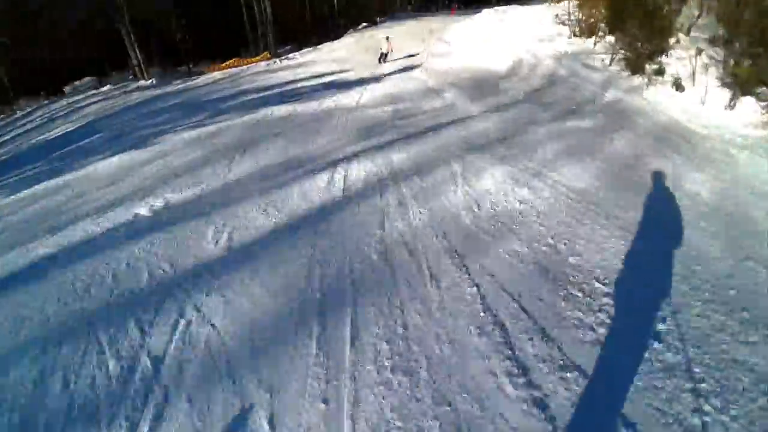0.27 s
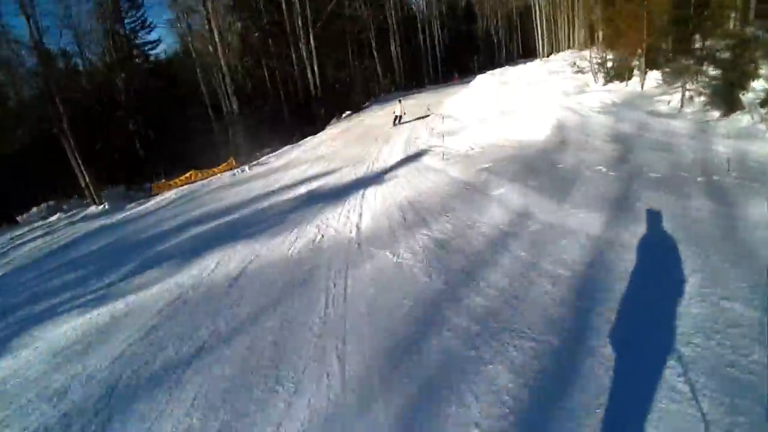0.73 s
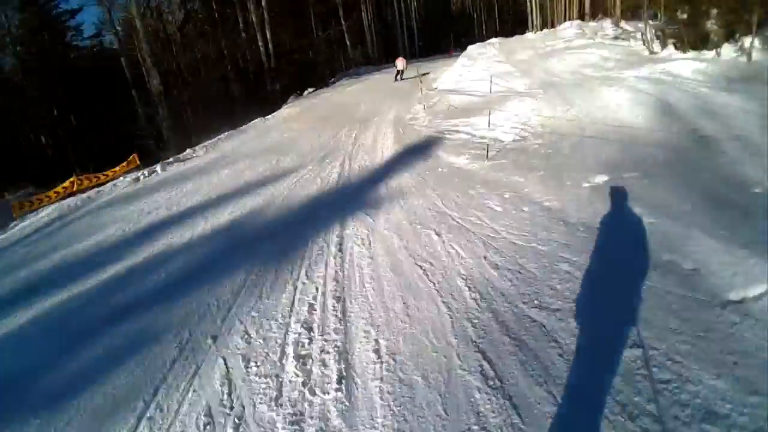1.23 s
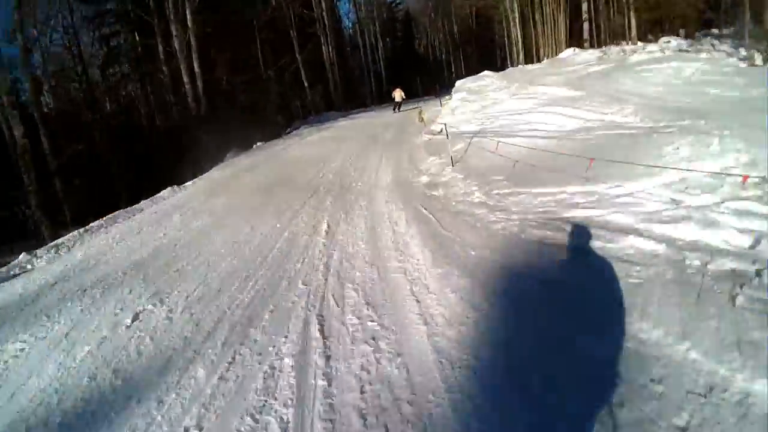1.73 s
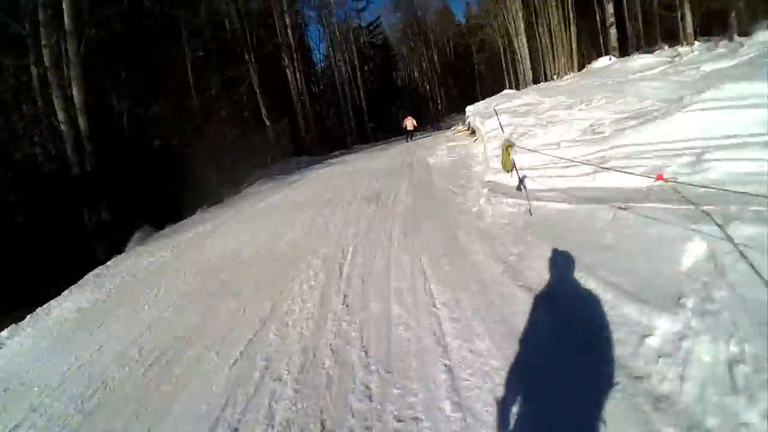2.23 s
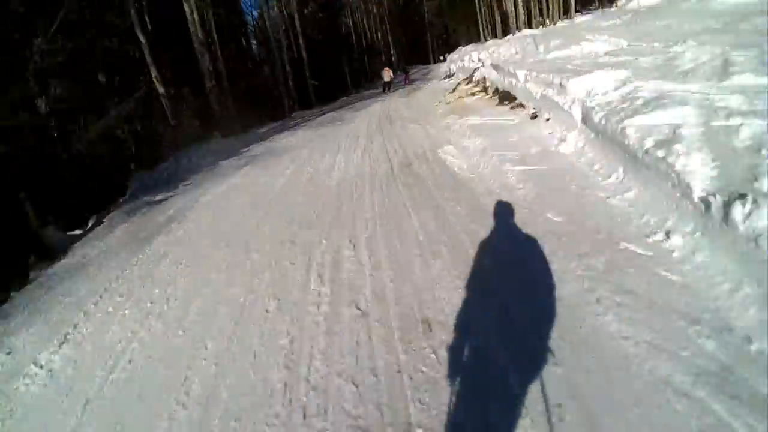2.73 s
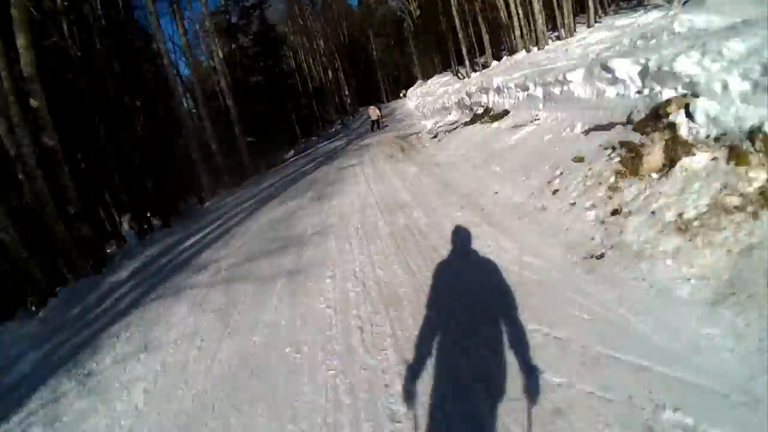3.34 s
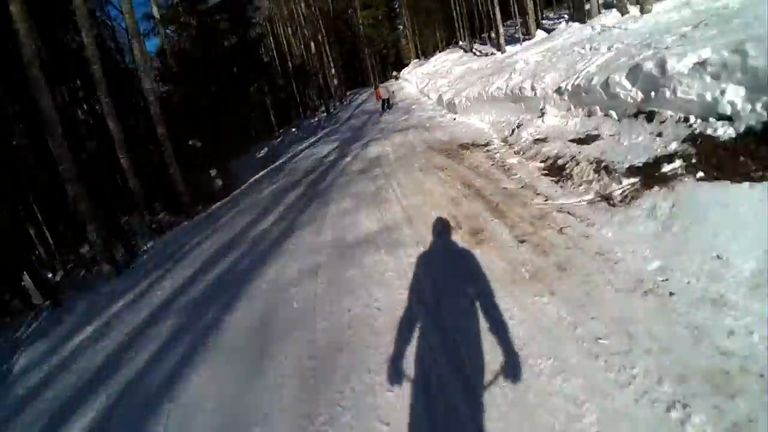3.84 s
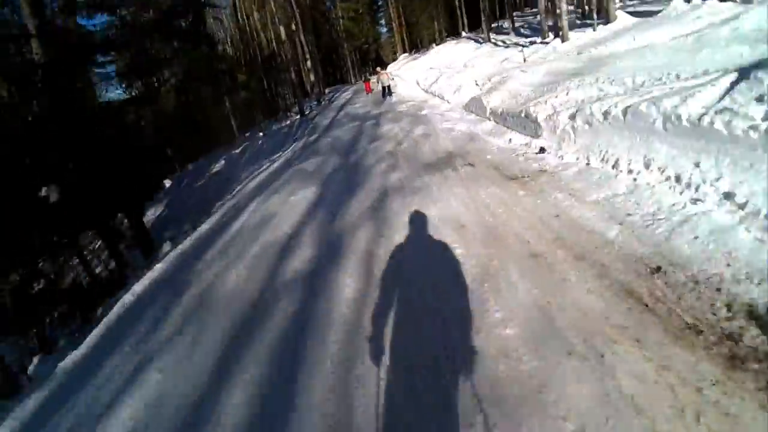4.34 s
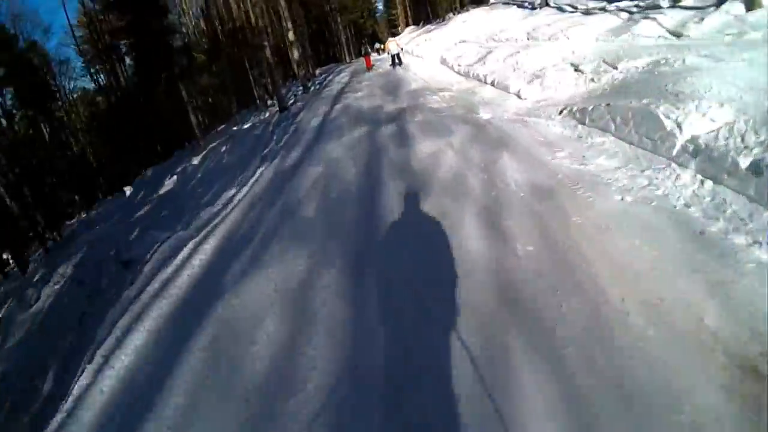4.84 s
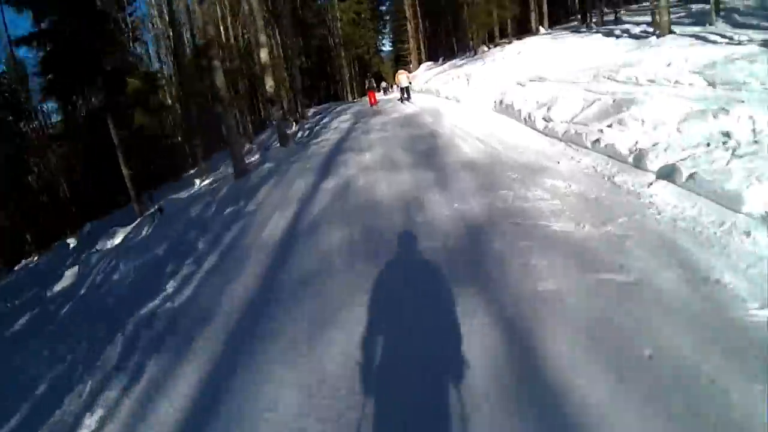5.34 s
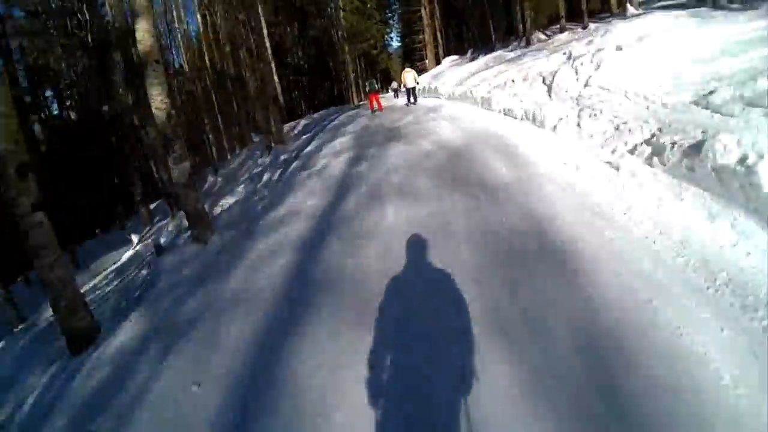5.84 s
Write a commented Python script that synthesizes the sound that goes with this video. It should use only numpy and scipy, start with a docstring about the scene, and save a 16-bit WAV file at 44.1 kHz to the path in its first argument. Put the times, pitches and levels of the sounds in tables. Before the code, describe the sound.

Skis slide over packed snow with a continuous, muffled scrape that swells and eases a little above a faint low rumble. Bumps make a plastic case knock on its mount, lightly at first, then in sharper clicks and short rattles with tiny creaks. The two loudest knocks come in the later part, then only the sliding remains. Everything sounds hollow, heard from inside the closed camera case worn by the skier.

```python
"""Skis on packed snow, heard inside a camera case

Friction of snow grains and ski edges excites the hollow resonances of the closed case the skier wears;
its wall shuts out the treble, and a low rumble is conducted through the skier's body.
Bumps make the case knock and rock on its mount; after some knocks its plastic joint ticks and
creaks by stick-slip friction. The camera adds a faint hiss and whine."""
import sys
import numpy as np
from scipy import signal
from scipy.fft import rfft, irfft
from scipy.io import wavfile
from scipy.ndimage import uniform_filter1d

SR = 44100
rng = np.random.default_rng(int(sys.argv[2]) if len(sys.argv) > 2 else 0)


def wrap_up_sound(samples):
    """Save the sound to the file named by the first command line argument, as 16-bit audio."""
    columns = np.atleast_2d(samples).T
    # keep every value between -1 and 1, then stretch to whole-number steps
    tamed = np.clip(columns, -1, 1)
    steps = np.round(tamed * 32767).astype(np.int16)
    wavfile.write(sys.argv[1], SR, steps)


N = 268128
TIME = np.arange(N) / SR

# tones of the camera's electronic whine: f/Hz, rms level/dB
WHINE_TONES = [(15132, -97), (15225, -97)]
# spectrum of the camera's hiss: f/Hz, relative level/dB
HISS_SPECTRUM = [(5000, -19), (6600, -1), (8200, -11.5), (9500, 1.5), (11500, 0.5), (15500, -2)]
# spectrum of a faint treble fizz, a signal artefact that rises with each low thud: f/Hz, level/dB
FIZZ_SPECTRUM = [(5000, -25), (6800, -10), (8300, -13.5), (10000, -2), (12500, 0), (15500, 0.5)]
# spectrum of the body-borne rumble: f/Hz, relative level/dB
RUMBLE_SPECTRUM = [(20, 3), (50, -6.5), (95, -6.5), (120, 0), (150, 1.5), (200, -7), (300, -13),
                   (450, -9.5), (900, -56), (3000, -81)]
# strength of the skis' scrape along the run: t/s, level/dB
SCRAPE_LEVEL = [(0.0, -51.5), (0.19, -46.0), (0.35, -49.5), (0.53, -42.5), (0.75, -46.5), (1.53, -40.5),
                (1.73, -42.5), (1.83, -38.5), (2.17, -44.0), (2.29, -42.0), (2.75, -46), (3.13, -43.5),
                (3.29, -49), (3.53, -43.5), (3.75, -47.5), (4.09, -44.0), (4.21, -46.5), (5.61, -44),
                (5.71, -47.5), (5.81, -44), (5.91, -48.0), (6.08, -45)]
# spectrum of the scrape through the case wall: f/Hz, relative level/dB
SCRAPE_SPECTRUM = [(250, -29), (550, -27.5), (720, -19), (1000, -15), (1200, -12.5), (1520, -5.5),
                   (1800, -10.5), (2300, -7.5), (2750, -7), (3100, -17.5), (3600, -26), (4100, -34.5),
                   (4750, -35.5), (5900, -67.5)]
# air and wall resonances of the case: f/Hz, half-width/Hz, lift/dB
CASE_MODES = [(442, 25, 12), (844, 71.7, 14), (1293, 116, 14), (2588, 70, 4.5), (4400, 42, 3.5)]
# spectrum of one slip in the plastic joint: f/Hz, relative level/dB
SLIP_SPECTRUM = [(200, -16.5), (650, -19), (1300, -4.5), (1800, -1.5), (2400, -10), (3150, -0.5),
                 (3700, -19), (4150, -22), (4900, -46), (5600, -45.5), (6200, -63.5), (8300, -71.5),
                 (9600, -44.5), (11400, -41.5), (13000, -59), (16000, -60.5)]
# resonances of the joint's plastic: f/Hz, half-width/Hz, lift/dB
JOINT_MODES = [(420, 56, 14.5), (1460, 55, 5), (1810, 27, 10.5), (3086, 18, 7), (3660, 85, 5)]
# creaks of the joint: t/s, duration/s, initial slip rate/Hz, initial slip level/dB
JOINT_CREAKS = [(1.244, 0.011, 260, -37), (1.478, .02, 350, -41), (2.2295, 0.033, 240, -25),
                (2.81, 0.021, 220, -29.5), (3.073, 0.027, 275, -37.5), (4.2672, .03, 250, -15),
                (5.1375, .008, 155, -20.5)]
# spectrum of a blunt knock of the case on its mount: f/Hz, relative level/dB
KNOCK_SPECTRUM = [(100, -34), (400, -22.5), (700, -12.5), (900, -6), (1100, 3.5), (1380, 4.5),
                  (1700, -14.5), (2100, -8), (2700, -7.5), (3200, -15.5), (3750, -39), (4500, -33.5),
                  (5500, -63), (8000, -81.5)]
# bumps that knock the case: t/s, click level/dB, rocking f/Hz, bounces (rounded to a whole number)
BUMPS = [ (.484, -35.5, 56, 0.5), (0.617, -28, 44.4, 0.5), (1.209, -34, 58, 0.5), (1.308, -29, 46, 0.5),
         (1.4545, -22, 44, 1), (1.567, -28, 49, 0.5), (1.6886, -19.3, 43, 4.5), (1.9351, -24, 53, 0.5),
         (1.9771, -15, 43, 1.5), (2.1912, -15.5, 56.7, 0.5), (2.302, -17, 52.5, 0),
         (2.7934, -15, 52.6, 0.5), (2.8364, -19, 46.7, 0), (3.0593, -19, 42.17, 3), (3.711, -28.5, 58, 0),
         (3.985, -27, 53.4, 0.5), (4.0292, -19, 41.8, 0), (4.2428, -8.5, 53, 0), (4.315, -33.5, 53, 0.5),
         (4.464, -27, 55.5, -0.5), (4.5288, -21, 52.4, 0.5), (4.933, -30.5, 56, 0.5),
         (4.998, -35, 53.6, 0.5), (5.1196, -8, 52.1, 0)]

CRUISE_DB, FIRM_KNOCK_DB = -45, -20  # reference levels of scrape and click


def undb(db):
    """Amplitude ratio of a level in decibels."""
    return 10 ** (np.asarray(db) / 20)


def unit(x):
    """Normalisation to rms 1."""
    return x / np.sqrt(np.mean(x ** 2))


def walk(rate):
    """Slow random modulation, rms 1: values held for 1 / rate seconds and smoothed twice."""
    hold = max(int(SR / rate), 2)
    steps = np.repeat(rng.standard_normal(N // hold + 1), hold)
    return unit(uniform_filter1d(uniform_filter1d(steps, hold), hold)[:N])


def response(spectrum, modes=(), size=4096):
    """Minimum-phase impulse response, peak 1, of a spectrum lifted by resonances."""
    f = np.maximum(np.fft.rfftfreq(size, 1 / SR), 1)
    hz, db = np.transpose(spectrum)
    db = np.interp(np.log(f), np.log(hz), db)
    for centre, width, lift in modes:
        db = db + lift / (1 + ((f - centre) / width) ** 2)
    cepstrum = irfft(np.log(undb(db)))
    cepstrum[1:size // 2] *= 2  # folding the cepstrum makes the response causal
    cepstrum[size // 2 + 1:] = 0
    h = irfft(np.exp(rfft(cepstrum)))
    return h / np.abs(h).max()


def ring(force, h):
    """Response of a linear system: the force convolved with the impulse response h."""
    return signal.fftconvolve(force, h)[:N]


def add(out, s, x):
    """Superposition of x on out, starting at s seconds."""
    i = int(np.clip(s * SR, 0, N - 1))
    out[i:i + len(x)] += x[:N - i]


def swell(t, peak_s):
    """Envelope of coupled resonance: a mode fed through another builds to 1 at peak_s, then decays."""
    return (t / peak_s * np.exp(1 - t / peak_s)) ** 2


def electronics(hiss_db=-89.5):
    """Self-noise of the camera: steady high tones over a faint random hiss."""
    whine = sum(np.sqrt(2) * undb(db) * np.sin(2 * np.pi * hz * TIME) for hz, db in WHINE_TONES)
    return whine + undb(hiss_db) * unit(ring(rng.standard_normal(N), response(HISS_SPECTRUM)))


def fizz(knocking, ceiling_db=-83, thud_hz=45, knee_db=-52):
    """Modulation noise: a faint treble fizz in the signal rises with each low thud, up to a ceiling."""
    thuds = signal.sosfiltfilt(signal.butter(2, thud_hz, fs=SR, output="sos"), knocking)
    depth = np.tanh(np.abs(signal.hilbert(thuds)) / undb(knee_db))
    return undb(ceiling_db) * depth * unit(ring(rng.standard_normal(N), response(FIZZ_SPECTRUM)))


def effort():
    """Strength of the sliding friction at each instant, in dB above easy cruising."""
    times, level_db = np.transpose(SCRAPE_LEVEL)
    return np.interp(TIME, times, level_db) - CRUISE_DB


def rumble(cruising_db=-64.5, db_per_db=0.69, shake_db=1.5):
    """Structure-borne sound: ski vibration travels up through the skier and grows with the scrape."""
    vibration = unit(ring(rng.standard_normal(N), response(RUMBLE_SPECTRUM)))
    return vibration * undb(cruising_db + db_per_db * effort() + shake_db * walk(20))


def snow(grains_per_s=2500, spread_db=1, grain_share=0.27):
    """Friction force under a ski: shot noise of crystals breaking one by one, over smooth sliding."""
    grains = (rng.random(N) < grains_per_s / SR) * rng.standard_normal(N)
    grains *= undb(spread_db * np.minimum(rng.exponential(size=N), 4))
    return np.sqrt(grain_share) * unit(grains) + np.sqrt(1 - grain_share) * rng.standard_normal(N)


def skis(gain_db=-0.36, chatter_db=0.5, chatter_hz=90, flicker_db=1.23, flicker_hz=35, split_hz=1900):
    """Forced vibration: sliding bases and biting edges chatter over ribbed snow and drive the case."""
    scrape = unit(ring(snow(), response(SCRAPE_SPECTRUM, CASE_MODES)))
    base = signal.sosfiltfilt(signal.butter(3, split_hz, fs=SR, output="sos"), scrape)
    edge = scrape - base
    bite_db = 0.5 - 0.18 * effort()  # harder scraping sounds duller
    base = base * undb(flicker_db * walk(flicker_hz))
    edge = edge * undb(bite_db + flicker_db * walk(flicker_hz))
    return (base + edge) * undb(gain_db + CRUISE_DB + effort() + chatter_db * walk(chatter_hz))


def creaks(tick_lag_s=0.021, tick_db=-28, end_db=-32, jitter=.08, scatter_db=1, quicken=.06):
    """Stick-slip friction: each slip rings the plastic joint, and slips quicken as the strain lets go."""
    force = np.zeros(N)
    # a firm knock with a quick swing strains the joint, which ticks back a moment later
    for s, click_db, rock_hz, _ in BUMPS:
        if click_db > -24 and rock_hz > 49:
            add(force, s + tick_lag_s, undb([tick_db]))
    for s, duration, rate, start_db in JOINT_CREAKS:
        timing, strength = rng.standard_normal((32, 2)).T
        gaps = (1 + jitter * timing) / (rate * (1 + quicken * np.arange(len(timing))))
        for lag, scatter in zip(np.cumsum(gaps) - gaps[0], strength):
            if lag < duration:
                slip_db = start_db + (end_db - start_db) * lag / duration + scatter_db * scatter
                add(force, s + lag, undb([slip_db]))
    # the joint is small and radiates little bass
    force = signal.sosfilt(signal.butter(2, 280, "high", fs=SR, output="sos"), force)
    return ring(force, response(SLIP_SPECTRUM, JOINT_MODES))


def disperse(h, hz, q):
    """All-pass dispersion: the wall delays the part of a click near its bending resonance."""
    _, poles = signal.iirpeak(hz, q, fs=SR)
    return signal.lfilter(poles[::-1], poles, h)


def strikes(loss_db=3.3, soften_db=2.2, gap_s=.032, gap_power=.15, first_t60_s=.05, bounce_t60_s=.09):
    """Inelastic bouncing: each rebound is weaker and comes sooner; the later ones land more softly."""
    for s, click_db, rock_hz, bounces in BUMPS:
        for k in range(round(bounces) + 1):
            force_db = click_db - FIRM_KNOCK_DB - k * loss_db
            soft_db = k * (k - 1) * soften_db
            yield s, force_db, soft_db, rock_hz, bounce_t60_s if k else first_t60_s
            s += gap_s * undb(gap_power * force_db)  # time in the air is a power of the force


def knocks(air_lag_s=.0014, rock_lag_s=.001, swing_cycles=1.02, rebound_cycles=.6, rebound_db=-18,
           shove_db=-4.5, jolt_db=-3.0, jolt_s=.0012, mount_hz=133, mount_db=-14.5):
    """Impact and damped oscillation: the case hits its mount, rocks, and meets the far stop softly."""
    out, t = np.zeros(N), TIME[:SR // 4]
    click = disperse(response(KNOCK_SPECTRUM), hz=2100, q=2.5)
    hollow = response(SCRAPE_SPECTRUM, CASE_MODES)
    for s, force_db, soft_db, rock_hz, t60 in strikes():
        click_db = FIRM_KNOCK_DB + force_db - soft_db
        # the thud and the ring of the air grow more slowly with force than the click
        thud_db, air_db = -32.5 + 0.69 * force_db, -33.5 + 0.51 * force_db
        # the enclosed air rings up a moment after the wall has clicked
        air_hz = 1350 + 30 * rng.standard_normal()
        air = np.sin(2 * np.pi * air_hz * t) * swell(t, peak_s=.003)
        # the blow shoves the case, which swings slowly while the mount's arm quivers faster
        shove = undb(shove_db - soft_db) * swell(t, peak_s=.0013)
        rock = np.sin(2 * np.pi * rock_hz * t) * np.exp(-np.log(1000) * t / t60)
        mount = undb(mount_db) * np.cos(2 * np.pi * mount_hz * t) * swell(t, peak_s=.0065)
        # the stop cuts the swing short with a brief push
        rock /= 1 + (t * rock_hz / swing_cycles) ** 6
        rebound_s = rebound_cycles / rock_hz
        jolt = undb(jolt_db) / (1 + ((t - rebound_s) / jolt_s) ** 2)
        add(out, s, -undb(click_db) * click)
        add(out, s, -undb(thud_db) * shove)
        add(out, s + air_lag_s, -undb(air_db) * air)
        add(out, s + rock_lag_s, undb(thud_db) * (rock - undb(-soft_db) * (jolt + mount)))
        add(out, s + rock_lag_s + rebound_s, -undb(click_db + rebound_db) * hollow)
    return out


def scene():
    """Superposition in one channel: the sounds inside the case, plus the signal's faint fizz."""
    knocking = knocks()
    return (skis() + rumble() + knocking + fizz(knocking) + creaks())[None]


def record(dry, low_cut_hz=22, top_hz=15700):
    """Band limiting: the camera adds its self-noise, then cuts the deepest bass and the top treble."""
    x = signal.sosfilt(signal.butter(1, low_cut_hz, "high", fs=SR, output="sos"), dry + electronics())
    return signal.sosfilt(signal.ellip(10, .1, 80, top_hz, fs=SR, output="sos"), x)


dry = scene()
out = record(dry)
wrap_up_sound(out)
```